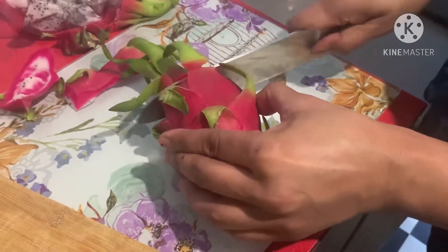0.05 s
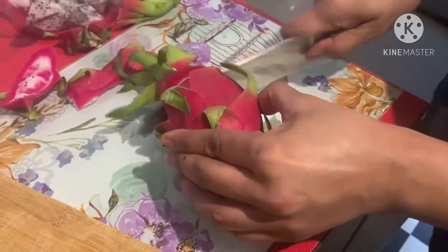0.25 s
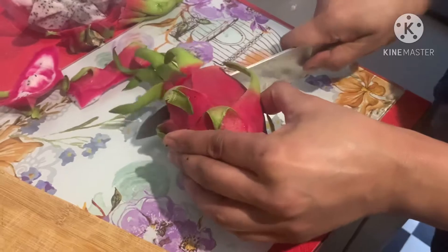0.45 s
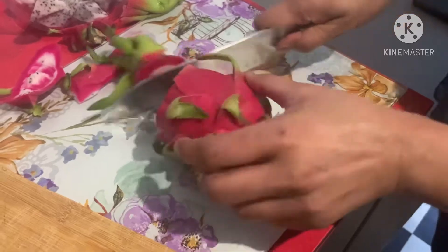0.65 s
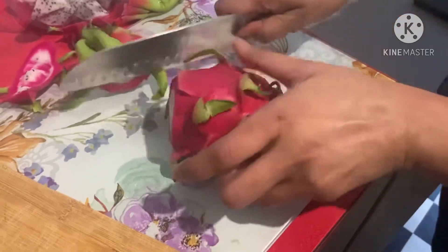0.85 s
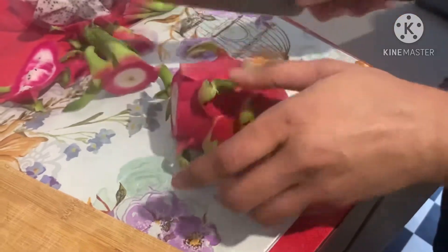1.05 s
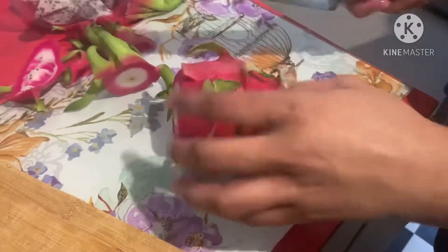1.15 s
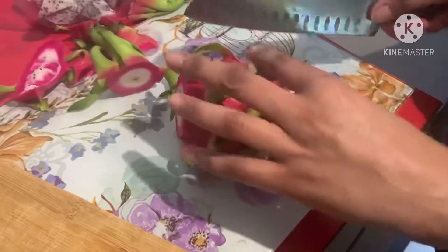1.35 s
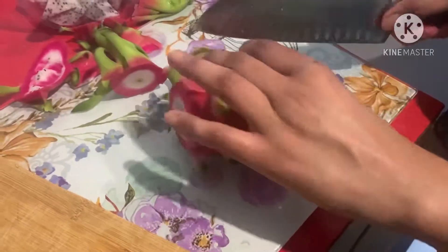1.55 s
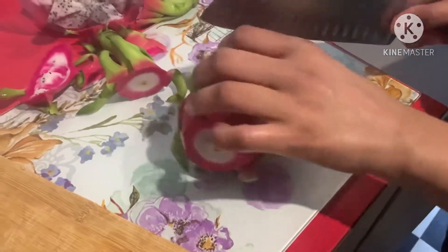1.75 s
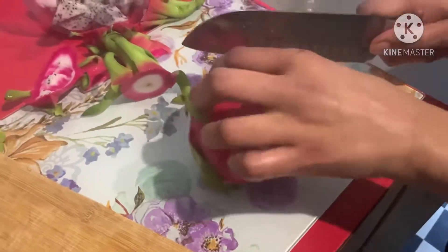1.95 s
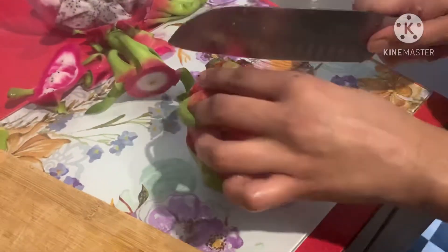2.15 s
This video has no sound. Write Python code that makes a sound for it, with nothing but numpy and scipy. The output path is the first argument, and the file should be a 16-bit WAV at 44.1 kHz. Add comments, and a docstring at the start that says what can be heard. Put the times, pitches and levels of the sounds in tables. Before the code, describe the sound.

Close up in a kitchen, a knife draws softly through fruit, snaps the skin and hits the cutting board with a sharp, briefly ringing knock. Then come a light tap and faint finger rubs over a low hum.

```python
"""A kitchen knife slices the end off a dragon fruit, over a faint low hum and room noise.
First a soft rasping draw with one squeak. At 0.2 s the skin snaps, then tears in a quick crescendo;
at 0.23 s the blade knocks on the cutting board, ringing steel, wood and, briefly, the kitchen.
From about 0.5 s small rumbles, taps, rubs and snaps follow as a hand turns the fruit."""
import sys
import numpy as np
from scipy import signal
from scipy.fft import rfft, irfft
from scipy.io import wavfile

SR = 44100
rng = np.random.default_rng(int(sys.argv[2]) if len(sys.argv) > 2 else 0)


def unload_wav(signal):
    """Save mono or channel-first audio to the path in sys.argv[1] as 16-bit WAV at rate SR, clipped to [-1, 1]."""
    wavfile.write(
        sys.argv[1],
        SR,
        np.round(np.clip(np.atleast_2d(signal).T, -1, 1) * 32767).astype(np.int16),
    )


N = 97020
T = np.arange(N) / SR


def amp(db):
    """Decibels to gain."""
    return 10 ** (np.asarray(db) / 20)


def unit(x):
    """Scales to rms 1."""
    return x / np.sqrt(np.mean(x ** 2) + 1e-20)


def read(points, hz):
    """Reads a table on a log-frequency axis."""
    f, value = np.transpose(points)
    return np.interp(np.log(hz + 1), np.log(f + 1), value)


def pan(side_db):
    """Left and right gains from an L-R level."""
    gains = np.array([amp(side_db / 2), amp(-side_db / 2)]).reshape(2, -1)
    return gains / np.sqrt((gains ** 2).mean(0))


def convolve(x, response):
    """Convolves per channel, cut to N samples."""
    return signal.fftconvolve(np.atleast_2d(x), np.atleast_2d(response), axes=1)[:, :N]


def colour(x, spectrum, balance=None):
    """Minimum-phase stereo filter of unit power: only the spectrum's shape counts."""
    hz = np.fft.rfftfreq(4096, 1 / SR)
    gain = amp(read(spectrum, hz)) * pan(read(balance, hz) if balance else 0 * hz)
    log_gain = np.log(np.concatenate([gain, gain[:, -2:0:-1]], 1))
    fir = np.fft.ifft(np.exp(np.conj(signal.hilbert(log_gain)))).real
    return convolve(x, fir / np.sqrt((fir ** 2).sum() / 2))


def spaced(x, bass_coherence=0.82, corner_hz=700):
    """Two nearby microphones: alike in the bass, unrelated in the treble."""
    hz = np.fft.rfftfreq(x.shape[1], 1 / SR)
    coherence = bass_coherence / (1 + (hz / corner_hz) ** 3)
    a, b = rfft(x)
    mid, side = a * np.sqrt((1 + coherence) / 2), b * np.sqrt((1 - coherence) / 2)
    return irfft(np.array([mid + side, mid - side]), x.shape[1])


def grains(per_s, spread_db=4.5):
    """Tiny random ruptures of uneven size, stereo, rms 1."""
    size = amp(spread_db * np.minimum(rng.exponential(1, (2, N)), 4))
    polarity = np.sign(rng.standard_normal((2, N)))
    fires = rng.random((2, N)) < per_s / SR
    return unit(spaced(size * polarity * fires))


def swell(peak_s, rise_s, fall_s):
    """Bell-shaped envelope."""
    return np.exp(-((T - peak_s) / np.where(T < peak_s, rise_s, fall_s)) ** 2)


def burst(start_s, decay_s):
    """Instant attack, exponential decay."""
    return (T >= start_s) * np.exp(-np.maximum(T - start_s, 0) / decay_s)


def ring(modes):
    """Decaying modes of a struck object."""
    return sum(amp(db - 60 * T / t60_s) * np.sin(2 * np.pi * hz * T) * pan(side_db)
               for hz, db, t60_s, side_db in modes)


# Room noise spectrum: (frequency [Hz], gain [dB])
AIR_SPECTRUM = [(20, -20.5), (45, 0.5), (75, -5.5), (115, 5), (170, 5), (230, -4.5), (400, -7.5),
                (600, -19), (1050, -22), (1500, -30.5), (2200, -27.5), (4500, -42.5), (14000, -58)]
# Room noise envelope: (time [s], level [dB])
AIR_ENVELOPE = [(0, -58.5), (0.35, -58.5), (0.55, -53), (0.7, -55.5), (0.85, -53), (1.2, -55),
                (1.75, -58.5), (1.97, -59), (2.2, -53.5)]
def room_noise():
    """Low noise, drifting in level."""
    noise = colour(spaced(rng.standard_normal((2, N))), AIR_SPECTRUM)
    return noise * amp(np.interp(T, *np.transpose(AIR_ENVELOPE)))


# Hum tones: (frequency [Hz], base level [dB], waver half-width [Hz])
HUM_TONES = [(146.3, -58, 10), (195.8, -64.5, 5.9)]
# Hum envelope: (time [s], gain [dB])
HUM_ENVELOPE = [(0, -2.5), (0.47, -12), (0.57, 0), (0.67, -19), (0.76, 3.5), (1.09, 7), (1.15, -0.5),
                (1.56, 2), (1.89, 3), (1.97, -13), (2.03, 8), (2.09, 9.5), (2.125, -6.5), (2.17, 10),
                (2.2, 4)]
def hum(waver=0.5):
    """Two low tones come and go; narrow-band noise makes each waver."""
    out, bins_hz = np.zeros(N), np.fft.rfftfreq(N, 1 / SR)
    envelope_db = np.interp(T, *np.transpose(HUM_ENVELOPE))
    for hz, db, width_hz in HUM_TONES:
        band = 1 / (1 + ((bins_hz - hz) / width_hz) ** 2)
        noise = unit(irfft(rfft(rng.standard_normal(N)) * band, N))
        tone = np.sin(2 * np.pi * (hz * T + rng.random()))
        out += amp(db + envelope_db) * unit(tone + waver * noise)
    return out


# Hiss spectrum: (frequency [Hz], gain [dB])
HISS_SPECTRUM = [(500, 2), (5000, -2.5), (9500, 2), (14000, -2)]
def hiss(level_db=-80):
    """Nearly white microphone hiss."""
    return amp(level_db) * colour(rng.standard_normal((2, N)), HISS_SPECTRUM)


# Kitchen decay: (frequency [Hz], T60 [s])
KITCHEN_T60 = [(150, 0.9), (400, 0.96), (700, 0.67), (2000, 0.78), (4000, 0.56), (6000, 0.42), (9000, 0.51),
               (14000, 0.28)]
def echoes(x, t60s=KITCHEN_T60, predelay_s=0.004):
    """Diffuse reflections, each band dying at its T60."""
    hz, t, bands = signal.stft(spaced(rng.standard_normal((2, SR))), SR, nperseg=256)
    decay = amp(-60 * t / read(t60s, hz)[:, None])
    tail = signal.istft(bands * decay, SR, nperseg=256)[1][:, :SR]
    tail *= T[:SR] > predelay_s
    crossfed = 0.8 * x + 0.89 * x[::-1]
    return convolve(crossfed, tail / np.linalg.norm(tail[0]))


# Hand presses: (peak time [s], half length [s], level [dB])
PRESSES = [(0.01, 0.029, -52.5), (0.522, 0.077, -58)]
# Rumble spectrum: (frequency [Hz], gain [dB])
RUMBLE_SPECTRUM = [(20, -23.5), (48, 2.5), (80, -11.5), (200, -36.5), (600, -69)]
def rumbles():
    """The hand presses on the table: swells of bass noise."""
    pressure = sum(amp(db) * swell(s, half_s, half_s) for s, half_s, db in PRESSES)
    return colour(rng.standard_normal(N) * pressure, RUMBLE_SPECTRUM)


# Light contacts: (time [s], level [dB], decay [s], L-R [dB], tilt [dB/octave])
TAP_HITS = [(0.6699, -46, 0.013, -1, 1.5), (1.951, -55.5, 0.00084, -7, -4), (2, -54, 0.0007, 11, 0.5)]
# Tap spectrum before tilt: (frequency [Hz], gain [dB])
TAP_SPECTRUM = [(50, -36), (220, -12), (500, 8), (800, 18.5), (1900, 11), (4200, 3), (5200, -6.5),
                (10000, -1.5), (15000, -24)]
def taps():
    """The cut end drops and fingers tap: dull noise bursts."""
    out = np.zeros((2, N))
    for s, db, decay_s, side_db, tilt in TAP_HITS:
        spectrum = [(hz, gain_db + tilt * np.log2(hz)) for hz, gain_db in TAP_SPECTRUM]
        contact = spaced(rng.standard_normal((2, N))) * amp(db) * burst(s, decay_s)
        out += colour(contact, spectrum) * pan(side_db)
    return out


# Finger slides: (peak time [s], half length [s], level [dB], centre [Hz])
SLIDES = [(0.834, 0.078, -64, 350), (0.902, 0.01, -66, 980), (0.905, 0.016, -69.5, 3960),
          (1.222, 0.085, -71, 1160), (1.246, 0.038, -72, 3100), (1.541, 0.016, -70.5, 1900),
          (1.674, 0.015, -72.5, 1190), (1.837, 0.05, -71.5, 900), (1.902, 0.013, -68, 1065),
          (2.033, 0.021, -64, 8400), (2.09, 0.019, -73, 7560), (2.195, 0.021, -64, 313)]
def rubs(skirt_db_per_oct=17.5):
    """Fingers slide on the skin: one band of friction grains each."""
    out, hz = np.zeros((2, N)), np.geomspace(30, 20000, 80)
    for s, half_s, db, centre_hz in SLIDES:
        band_db = -skirt_db_per_oct * abs(np.log2(hz / centre_hz))
        friction = grains(per_s=1800) * swell(s, half_s, half_s) * amp(db)
        out += colour(friction, np.c_[hz, band_db])
    return out


# Crinkle spectrum: (frequency [Hz], gain [dB])
CRINKLE_SPECTRUM = [(900, -11.5), (3000, -31), (7300, -26), (8300, 20), (12000, -15)]
def crinkle(level_db=-66):
    """Sparse bright ticks on the right as the fruit is turned."""
    ticks = grains(per_s=320) * swell(peak_s=1.912, rise_s=0.032, fall_s=0.032)
    return amp(level_db) * colour(ticks, CRINKLE_SPECTRUM) * pan(side_db=-12)


# Fibre breaks: (time [s], level [dB], centre [Hz], L-R [dB])
FIBRE_BREAKS = [(0.201, -22.5, 10300, -2), (0.897, -59.5, 12920, -4), (1.319, -59.5, 13300, 2),
                (1.32, -60.5, 9400, -9), (1.9419, -52.5, 8980, -14)]
def snaps(decay_s=0.0023, floor_db=-21.5, width_oct=0.2):
    """Skin fibres snap: short bright cracks, each around its own pitch."""
    out, hz = np.zeros((2, N)), np.geomspace(200, 16000, 60)
    for s, db, centre_hz, side_db in FIBRE_BREAKS:
        peak = np.exp(-(np.log2(hz / centre_hz) / width_oct) ** 2)
        spectrum = np.c_[hz, 20 * np.log10(amp(floor_db) + peak)]
        snap = rng.standard_normal((2, N)) * burst(s, decay_s)
        out += colour(snap, spectrum) * amp(db) * pan(side_db)
    return out


# Board modes: (frequency [Hz], gain [dB], T60 [s], L-R [dB])
BOARD_MODES = [(170, -24, 0.22, -2.5), (305.5, -37, 0.71, -5), (650, -11, 0.085, 10),
               (790, -6.5, 0.028, 13), (770.6, -12.5, 0.14, 6.5), (898.2, -10, 0.065, 3.5),
               (1478, -34.5, 0.35, 1)]
def board_ring():
    """Impulse response of the wooden cutting board."""
    return ring(BOARD_MODES)


# Blade modes: (frequency [Hz], gain [dB], T60 [s], L-R [dB])
BLADE_MODES = [(1831, -17, 0.06, -1.5), (2121, -50.5, 1.7, -2), (3696, -20.5, 0.09, 9),
               (3655, -19, 0.068, 1), (3970, -16.5, 0.13, -2.5), (4244, -14.5, 0.028, -4),
               (4880, -27, 0.12, -3.5), (7930, -21, 0.09, -2)]
def blade_ring():
    """Impulse response of the steel blade."""
    return ring(BLADE_MODES)


# Blade strokes: (peak time [s], rise [s], fall [s], level [dB], L-R [dB])
STROKES = [(0.046, 0.051, 0.048, -45.5, -0.5), (0.201, 0.048, 0.015, -52.5, 1),
           (0.666, 0.15, 0.096, -70, -2.5)]
# Rasp spectrum: (frequency [Hz], gain [dB])
RASP_SPECTRUM = [(300, -11.5), (660, -8.5), (775, 2.5), (1300, 1.5), (2800, -2.5), (4000, 0.5),
                 (5200, -5.5), (9800, 3), (13500, -5.5), (15500, -29.5)]
def draws(board_db=-16):
    """The blade rasps through the fruit and faintly rings the board."""
    pressure = sum(swell(s, rise_s, fall_s) * amp(db) * pan(side_db)
                   for s, rise_s, fall_s, db, side_db in STROKES)
    rasp = colour(grains(per_s=12000) * pressure, RASP_SPECTRUM)
    wood = board_ring().mean(0)
    return rasp + amp(board_db) * convolve(rasp, wood / np.linalg.norm(wood))


def squeak(hz=4450, level_db=-54):
    """The blade catches on the skin: one brief tone."""
    return amp(level_db) * swell(peak_s=0.04, rise_s=0.012, fall_s=0.012) * np.sin(2 * np.pi * hz * T)


# Tear spectrum: (frequency [Hz], gain [dB])
TEAR_SPECTRUM = [(60, -48.5), (300, -15.5), (750, -1), (1200, -1), (1900, -2), (2500, -3), (3300, -7),
                 (3950, 6), (5400, -10.5), (6200, 8.5), (7400, -11), (7900, 3.5), (9200, -20), (13200, -18),
                 (15000, -45)]
# Tear balance: (frequency [Hz], L-R [dB])
TEAR_BALANCE = [(800, 2.5), (1800, -14.5), (4200, -13.5), (6500, -6), (11000, -3)]
def tear(start_s=0.202, peak_s=0.229, stop_s=0.0011, peak_db=-11, rise_db_per_s=1179.5, blade_db=-17.5):
    """The last of the skin gives way in a quick crescendo that rings the blade."""
    rise = amp(peak_db - rise_db_per_s * np.maximum(peak_s - T, 0)) * (T > start_s)
    release = np.exp(-np.maximum(T - peak_s, 0) / stop_s)
    ruptures = grains(per_s=32000, spread_db=-1.37) * rise * release
    rip = colour(ruptures, TEAR_SPECTRUM, TEAR_BALANCE)
    steel = blade_ring()
    return rip + amp(blade_db) * convolve(rip, steel / np.linalg.norm(steel))


# Jolts to blade and board: (time [s], ring gain [dB], crack level [dB])
JOLTS = [(0.2022, -37.5, -41), (0.2301, -9, -12.5), (0.2327, -17.5, -12), (0.2379, -26.5, -18)]
def knock(board_highpass_hz=149.2):
    """Jolts ring steel and wood: first the skin snaps, then the blade lands and bounces on the board."""
    highpass = signal.butter(2, board_highpass_hz, "high", fs=SR, output="sos")
    response = blade_ring() + signal.sosfilt(highpass, board_ring())
    out = np.zeros((2, N))
    for s, ring_db, _ in JOLTS:
        at = round(s * SR)
        out[:, at:] += amp(ring_db) * response[:, :N - at]
    return out


# Crack spectrum: (frequency [Hz], gain [dB])
CRACK_SPECTRUM = [(60, -26), (170, -3), (400, -0.5), (530, -13.5), (1300, 0), (1830, 4), (2600, -4.5),
                  (3400, -2.5), (3900, 12.5), (4800, -2.5), (8000, -9), (10500, -6), (12000, -19.5),
                  (13200, -5), (14000, -29)]
def crack(decay_s=0.0032):
    """Noise burst of each jolt."""
    force = sum(amp(crack_db) * burst(s, decay_s) for s, _, crack_db in JOLTS)
    return colour(grains(per_s=32000, spread_db=-1.37) * force, CRACK_SPECTRUM)


def scene(counter_db=-11, counter_t60_s=0.18, kitchen_db=-17, ringing_send_db=-7.5):
    """Knife and hand, with quick echoes off the counter and the longer ring of the kitchen."""
    crisp = draws() + squeak() + crack() + snaps() + rumbles() + taps() + rubs() + crinkle()
    ringing = tear() + knock()
    counter = echoes(crisp + ringing, [(hz, counter_t60_s) for hz, _ in KITCHEN_T60])
    kitchen = echoes(crisp + amp(ringing_send_db) * ringing)
    background = (room_noise() + hum()) * pan(side_db=-0.8) + hiss()
    return background + crisp + ringing + amp(counter_db) * counter + amp(kitchen_db) * kitchen


def record(dry):
    """Linear-phase low-pass at 14.4 kHz."""
    lowpass = signal.firwin(511, 14400, window=("kaiser", 9), fs=SR)
    return signal.oaconvolve(dry, lowpass[None], "same", axes=1)


dry = scene()
out = record(dry)
unload_wav(out)
```